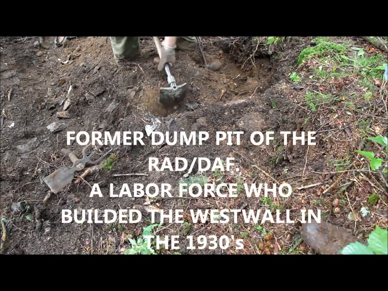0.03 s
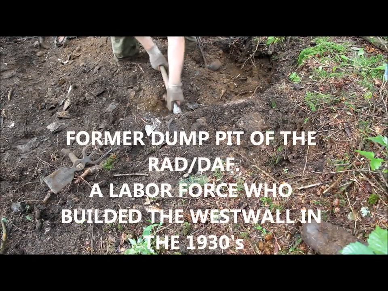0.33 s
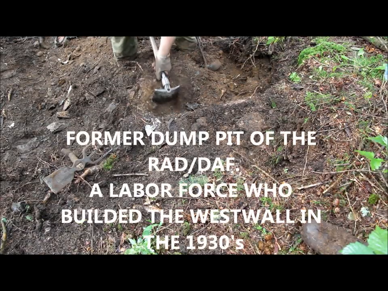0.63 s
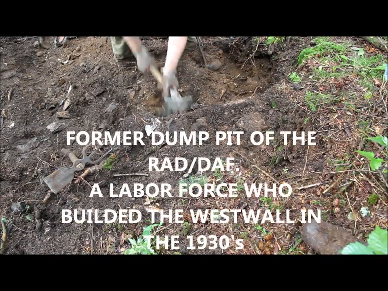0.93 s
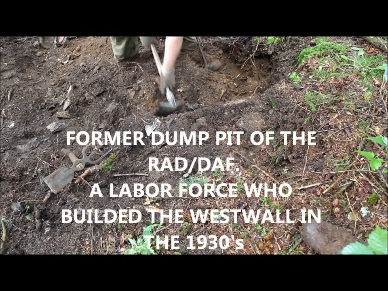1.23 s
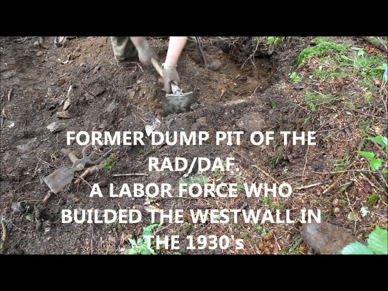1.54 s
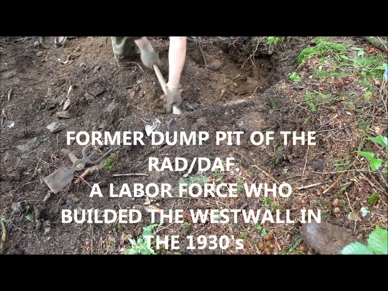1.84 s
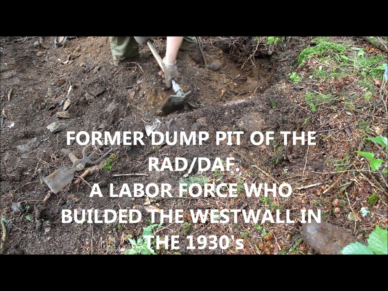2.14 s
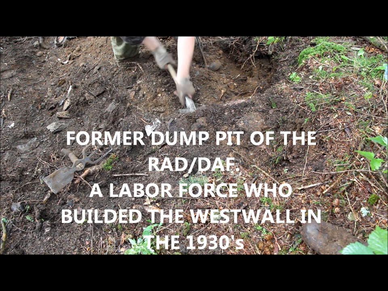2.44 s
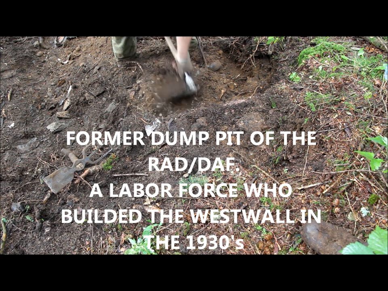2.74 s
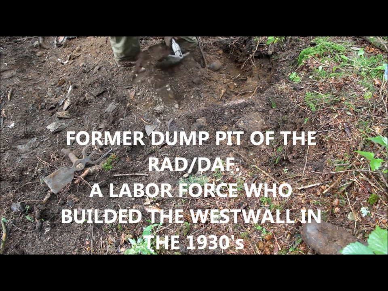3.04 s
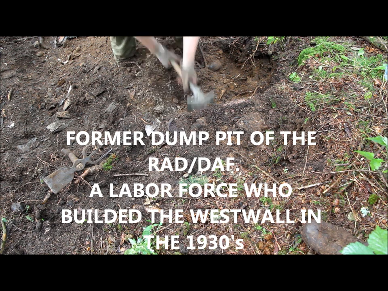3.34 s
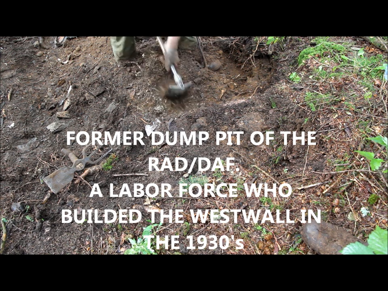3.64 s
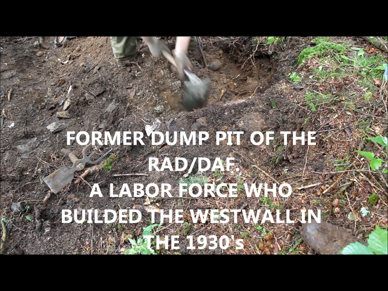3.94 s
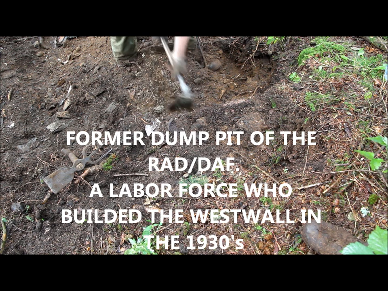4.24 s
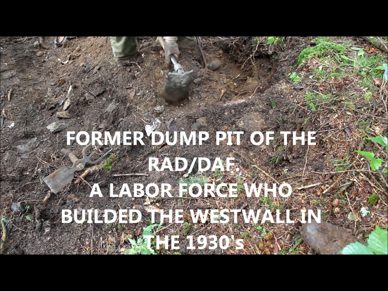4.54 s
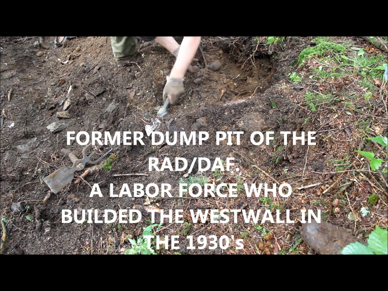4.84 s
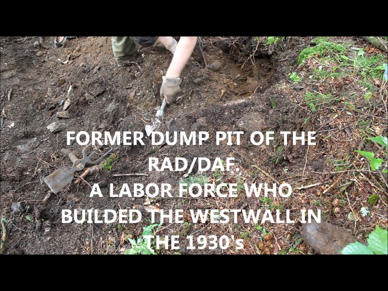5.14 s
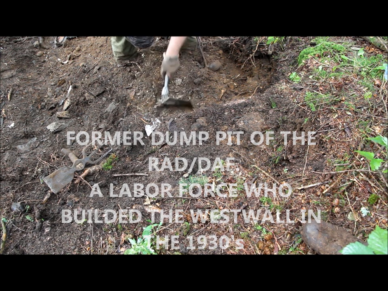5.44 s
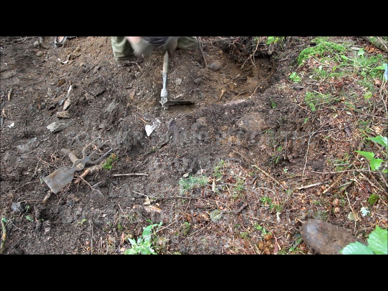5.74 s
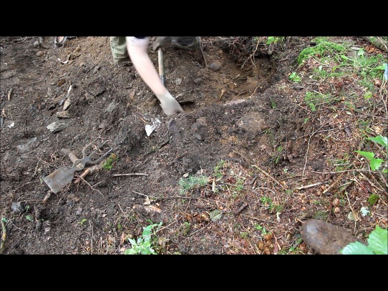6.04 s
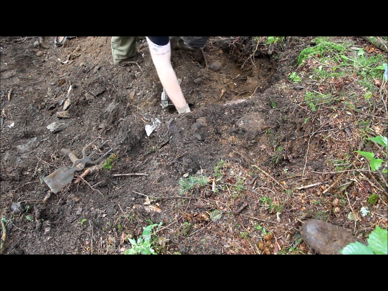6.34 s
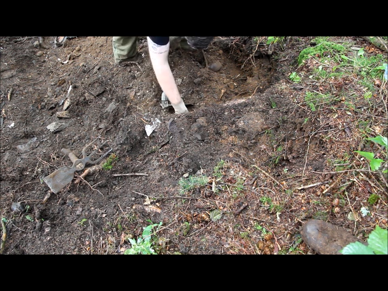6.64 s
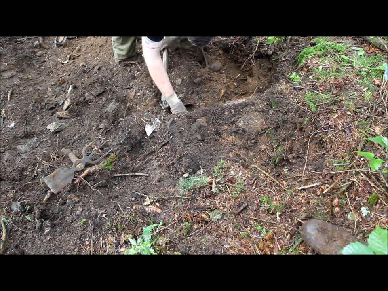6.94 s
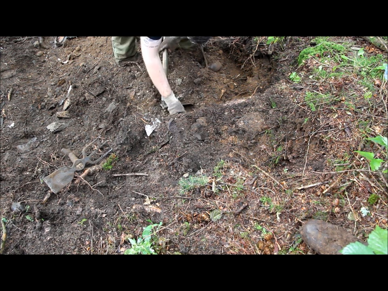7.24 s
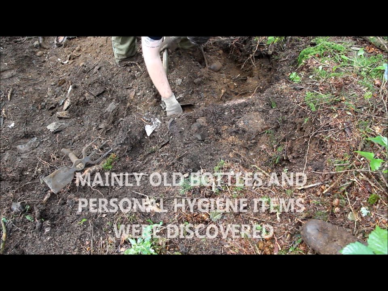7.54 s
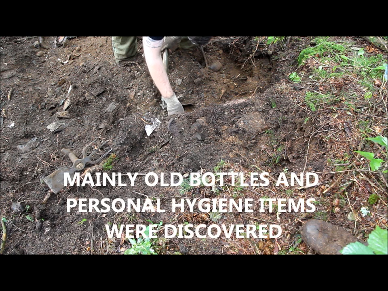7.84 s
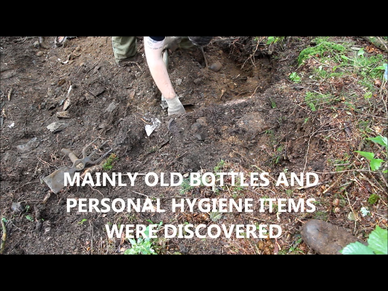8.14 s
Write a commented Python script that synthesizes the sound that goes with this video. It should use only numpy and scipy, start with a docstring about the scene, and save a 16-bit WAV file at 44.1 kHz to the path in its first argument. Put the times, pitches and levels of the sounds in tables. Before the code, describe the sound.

A small steel shovel hacks into stony soil close by, in short repeated strokes. Grit hisses along the blade, stones make it clink and ring briefly, and tossed earth patters down with dull thuds. After about five seconds the shovel is set down with a clink, and a gloved hand picks quietly through ticking crumbs. Light wind runs through the forest, and a distant bird chirps very faintly in the second half.

```python
"""A faint rustle and a few ticking crumbs come first, then a small steel shovel hacks into stony soil.
In each short stroke, grit hisses along the blade, stones make it ring and the earth thuds.
Loads of earth are tossed aside, the shovel is set down with a clink, and a gloved hand picks through
the crumbs. Light wind stirs the forest all along, and near the end a small bird calls faintly."""
import sys
import numpy as np
from scipy import signal
from scipy.fft import rfft, irfft, next_fast_len
from scipy.io import wavfile
from scipy.ndimage import map_coordinates

SR = 44100
rng = np.random.default_rng(int(sys.argv[2]) if len(sys.argv) > 2 else 0)


def unload_audio(sound):
    """Save the sound as a 16-bit wav file, at the path given as the first command line argument."""
    columns = np.transpose(np.atleast_2d(sound))
    # keep every value between -1 and 1, then stretch to whole-number steps
    steps = np.round(np.clip(columns, -1, 1) * 32767)
    wavfile.write(sys.argv[1], SR, steps.astype(np.int16))


N = 370440  # 8.4 seconds

# A ring time (t60) is how long a sound takes to fade by 60 dB. Levels are set before mixing.
# the blade drags through earth: (time [s], fall [s], level [dB], flex level [dB], flex pitch [Hz])
DRAGS = [(0.427, 0.009, -24.5, -38.5, 615), (0.518, 0.0043, -19.5, -27.5, 394),
         (0.548, .018, -34, -39, 570), (0.601, 0.014, -27.5, -39.5, 1900), (1.221, 0.022, -31, -35, 1320),
         (1.261, .026, -55, -46.5, 640), (1.308, 0.0097, -27.5, -34, 660), (1.342, 0.0066, -26, -40.5, 606),
         (1.806, .011, -25.5, -43, 600), (1.84, 0.0055, -34, -49, 1300), (1.928, 0.009, -25.5, -32.5, 610),
         (1.953, 0.0069, -28, -42.5, 600), (2.037, 0.02, -40, -48, 546), (2.081, 0.0045, -30.5, -41, 1290),
         (2.11, 0.0095, -36, -62, 600), (2.137, 0.022, -39.5, -65, 1300), (3.492, .01, -26, -42, 1300),
         (3.512, 0.0057, -24.5, -32.5, 1290), (3.58, 0.01, -30.5, -41.5, 1300),
         (3.605, 0.0044, -25, -35.5, 600), (3.628, 0.0069, -23, -28, 1920), (3.65, 0.0079, -41, -40.5, 370),
         (3.679, 0.015, -30.5, -52, 370), (3.722, 0.015, -29, -48, 367), (3.75, 0.0063, -35.5, -56, 1900),
         (4.123, 0.021, -37.5, -49.5, 600), (4.157, 0.0065, -23.5, -37.5, 1300),
         (4.25, 0.024, -31.5, -39, 1870), (4.293, 0.0063, -22, -31, 645), (4.335, 0.015, -31, -44.5, 368),
         (4.371, 0.0045, -24.5, -29, 1320), (5.161, 0.005, -45, -42, 620), (5.178, 0.0031, -28, -62, 1900),
         (5.197, 0.0032, -37, -58, 600)]
# the steel blade's own tones: (pitch [Hz], level [dB], ring time before the earth damps it [s])
BLADE_TONES = [(379, -1.5, 0.069), (553, 0, 0.14), (1308, 7.5, 0.023), (1921, 3.5, 0.051),
               (2100, -12, 0.046), (3123, 1, 0.034), (3887, 0.5, 0.07), (4024, 2.5, 0.066),
               (4430, -5, 0.012), (4890, 0.5, 0.084), (5480, -4, 0.017), (5770, 3, 0.076),
               (6906, 5.5, 0.051), (7900, -15, .07), (8280, 1, 0.035), (8990, -1, 0.045),
               (9330, -30, 0.076), (11000, -13, .04)]
# the blade meets a stone: (time [s], level [dB], crack pitch [Hz], knock level offset [dB])
STONE_HITS = [(0.417, -12.5, 5570, -17), (0.5173, -16, 3540, -34), (0.617, -16.5, 4250, -35),
              (1.137, -16.5, 1100, -14), (1.3364, -23, 6660, -29.5), (1.372, -14, 4720, -33),
              (1.387, -23, 5070, -38), (1.3986, -21.5, 3760, -36), (1.771, -17.5, 6370, -33),
              (2.0773, -17.5, 4340, -31), (2.1037, -17.5, 5100, -40), (2.293, -30, 3300, -15),
              (2.5701, -6, 2110, -18), (3.6043, -10.5, 5480, -30), (3.622, -12.5, 2720, -17),
              (3.7234, -13.5, 3040, -31), (3.748, -17.5, 8300, -29), (4.292, -13.5, 3900, -34),
              (4.365, -10, 4410, -15.5), (5.1575, -24, 2500, -24), (5.4213, -28, 3150, -17),
              (5.5637, -12.5, 3830, -38)]
# a stone's own tones: (pitch [ratio to their centre])
STONE_RATIOS = [.72, 0.949, 1.22, 1.65]
# the blade rings on, clear of the earth: (time [s], level [dB], pitch [Hz], ring time [s])
FREE_RINGS = [(1.372, -22, 4200, .05), (1.388, -23, 5600, 0.063), (2.291, -44.5, 1933, 0.45),
              (2.295, -43, 3130, 0.13), (2.571, -15, 2160, 0.036), (2.571, -16, 3130, 0.037),
              (3.05, -55, 5400, .35), (5.386, -31, 8300, 0.036), (5.566, -29, 1885, 0.065),
              (5.567, -20.5, 2750, 0.038), (5.565, -22, 4300, 0.031), (5.566, -22, 8280, 0.033)]
# the blade or a clod hits packed earth: (time [s], level [dB])
EARTH_BLOWS = [(0.42, -29.5), (0.841, -34), (0.89, -33), (1.139, -34.5), (1.304, -42), (1.808, -35),
               (3.509, -34), (3.63, -38), (6.666, -46)]
# loose earth slides and lands:
# (time [s], rise [s], hold [s], fade [dB/s], level [dB], clod level offset [dB])
EARTH_LOADS = [(0.835, 0.0048, 0.022, 129, -25, -12), (2.57, 0.0044, 0.0087, 400, -34.5, -9.5),
               (2.656, 0.031, 0.044, 300, -38, -14.5), (2.754, 0.014, .075, 328, -37, -17.5),
               (6.66, .006, .012, 161, -43, -15), (6.723, 0.055, .008, 165, -37, -12)]
# crumbs, pebbles and twigs tick: (time [s], level [dB], pitch [Hz])
CRUMB_TICKS = [(0.178, -24.5, 4940), (0.26, -25.5, 3800), (0.711, -30.5, 1330), (0.79, -31, 1260),
               (1.651, -25.5, 1080), (2.471, -25.5, 1340), (2.91, -26, 2730), (3.11, -26, 4100),
               (3.138, -30.5, 1170), (3.167, -22, 1920), (3.836, -22.5, 1920), (4.706, -40.5, 805),
               (5.097, -30, 732), (6.063, -30, 1910), (6.387, -28, 1120), (6.567, -26, 2440),
               (7.066, -28.5, 1630), (7.228, -26.5, 1000), (7.473, -32, 2720), (7.704, -26, 2200),
               (7.816, -29.5, 3240), (7.989, -29, 4890), (8.014, -28.5, 1050), (8.097, -23.5, 1630),
               (8.213, -28, 4640), (8.285, -25, 2300)]
# damp soil gives way under a hand or boot: (time [s], fall [s], level [dB])
SOIL_SHIFTS = [(3.26, 0.065, -49), (5.235, 0.018, -47), (8.26, 0.045, -52)]
# hand and boots brush the litter, the loose bits on the ground: (time [s], fall [s], level [dB])
BRUSHES = [(0.01, 0.052, -47.5), (0.19, 0.1, -43.5), (2.6, 0.069, -42), (2.91, 0.15, -53),
           (3.24, 0.082, -52.5), (3.42, .02, -49.5), (3.95, 0.054, -54), (4.865, 0.033, -46),
           (4.962, .016, -39), (5.28, 0.12, -46.5), (5.435, .025, -41), (5.61, 0.083, -47),
           (5.78, 0.066, -50.5), (6.52, 0.12, -55), (7.24, 0.014, -44.5), (8.27, 0.18, -50.5)]
# the litter never quite comes to rest: (time [s], level [dB])
SETTLING_LEVELS = [(0, -57.5), (2.3, -50.5), (4.6, -55), (5.7, -53), (6.1, -60.5), (7.4, -59), (8, -54.5),
                   (8.4, -52)]
# a small, distant bird calls: (time [s], level [dB], top pitch [Hz])
BIRD_CALLS = [(6.085, -65, 6100), (6.5, -54, 7740), (7.395, -61, 7600)]
# wind in the trees: (time [s], level [dB])
WIND_LEVELS = [(0, -56), (1.5, -54.5), (3.3, -52.5), (4.6, -55.5), (7.6, -54), (8.4, -54)]

# the tone colour of each noise, from bass to treble: (frequency [Hz], level [dB])
GRIT_COLOUR = [(150, -50), (600, -1), (1200, -5.5), (2200, 0), (4000, 3), (7000, -5.5), (10000, -8),
               (16000, -22)]  # grit on steel
THUD_COLOUR = [(30, -43), (80, -16), (170, -3.5), (300, -2.5), (480, -9), (900, -11), (1600, -20),
               (4000, -49)]  # shoved or struck earth
PATTER_COLOUR = [(200, -37), (600, -3), (1500, 0), (3500, 4.5), (6500, 1), (9500, -2.5), (12000, -13.5),
                 (16000, -23)]  # fine earth landing
CLOD_COLOUR = [(25, -29), (60, -6), (200, 1.5), (400, -3), (900, -7), (3000, -37.5)]  # clods landing
LITTER_COLOUR = [(200, -10), (700, -7.5), (2000, -2.5), (4000, -1), (7000, -4), (10000, -9.5), (16000, -21)]  # rustling litter
WIND_COLOUR = [(20, -36), (40, -10), (58, 0), (80, -1), (115, -1), (160, -1.5), (250, 1), (480, -2),
               (1000, 0.5), (2300, -4.5), (5500, -14.5), (7600, -15), (10000, -19.5), (16000, -30.5)]  # wind in the treetops


def shovel_scrapes(grit_db=-1.5, ring_db=-2.0, flex_db=4.5, thud_db=-15.5, catch_db=4):
    """Each drag makes grit hiss, rings the edge, flexes the whole blade and shoves the soil."""
    out, t = np.zeros(N), np.arange(-SR // 20, SR // 10) / SR
    for s, fall, db, bend_db, bend_hz in DRAGS:
        swell = swell_of(t, 0.89 * fall, fall)
        catching = np.tanh(wobble(252.5, size=len(t)))  # the edge catches and slips on coarse grains
        crunch = swell * unit(amp(catch_db * catching))
        grit = crunch * coloured(grains(len(t), rate=3000, spread=0.89), GRIT_COLOUR)
        contact_hz = 4600 * np.exp(rng.uniform(-0.084, 0.18))  # each drag meets the edge somewhere else
        edge = rubbed(crunch, blade_ring(contact_hz, octaves=0.95, vary=0.79, detune=.022, damping=0.64))
        flex = rubbed(swell, blade_ring(bend_hz, octaves=0.7, vary=0.097, detune=0.005, damping=0.88))
        thud = swell * coloured(rng.standard_normal(len(t)), THUD_COLOUR)
        steel = amp(db + ring_db) * edge + amp(bend_db + flex_db) * flex
        add(out, s + t[0], amp(db + grit_db) * grit + steel + amp(db + thud_db) * thud)
    return out


def blade_ring(centre_hz, octaves, vary, detune, damping):
    """One tap wakes the blade's tones, mostly near centre_hz; clinging earth shifts their pitch."""
    t = np.arange(SR // 12, dtype=np.float32) / SR
    hz, db, t60 = np.transpose(BLADE_TONES)
    gain, shift, phase = rng.uniform(-1.0, 1, (3, len(BLADE_TONES)))
    ring_time = t60 * damping
    distance = np.log2(hz / centre_hz) / octaves
    weight = amp(db) * np.exp(vary * gain - .5 * distance ** 2) / np.sqrt(ring_time)
    pitch = hz * (1 + detune * shift)
    tones = np.sin(2 * np.pi * np.outer(t, pitch) + np.pi * phase)
    ring = (tones * fade(t[:, None], ring_time)) @ weight
    return ring / np.linalg.norm(ring)


def rubbed(swell, ring):
    """Rubbing is a stream of tiny taps that keeps the blade ringing, with the energy of the swell."""
    taps = swell * grains(len(swell), rate=6500, spread=0.28)
    ringing = signal.fftconvolve(taps, ring)[:len(swell)]
    return unit(ringing) * np.sqrt(np.mean(swell ** 2))


def stone_hits(crack_db=-13, ring_db=-16, clack_db=-18, knock_db=-10):
    """A stone cracks against the steel; both ring briefly, damped by the earth."""
    out, t = np.zeros(N), np.arange(SR // 12) / SR
    for s, db, hz, low_db in STONE_HITS:
        noise = unit(resonant(resonant(rng.standard_normal(len(t)), hz, q=1.0), hz, q=0.2))
        crack = noise * (fade(t, t60=0.053) + 2.53 * fade(t, t60=0.013))
        ring = blade_ring(hz, octaves=1.23, vary=0.12, detune=0.0375, damping=0.77)
        ring = ring / np.std(ring[:SR // 200])  # the first 5 ms set its level
        # every stone clacks with a few tones of its own
        scatter = np.exp(0.11 * rng.standard_normal(len(STONE_RATIOS)))
        stone_hz = np.sqrt(hz * 3700) * np.array(STONE_RATIOS) * scatter
        tones = np.sin(2 * np.pi * (np.outer(t, stone_hz) + rng.random(len(STONE_RATIOS))))
        clack = unit(tones.sum(axis=1)) * fade(t, t60=0.065)
        knock = coloured(rng.standard_normal(len(t)), THUD_COLOUR) * fade(t, t60=0.064)
        bright = amp(crack_db) * crack + amp(ring_db) * ring + amp(clack_db) * clack
        add(out, s, amp(db) * (bright + amp(low_db + knock_db) * knock))
    return soften(out, above_hz=11500)  # the contact takes a moment, which limits the treble


def singing_blade(rise_s=0.0011):
    """Tapped while clear of the earth, the blade sings on in pure tones."""
    out, t = np.zeros(N), np.arange(SR // 3) / SR
    onset = 1 - np.exp(-t / rise_s)
    for s, db, hz, t60 in FREE_RINGS:
        add(out, s, amp(db) * onset * fade(t, t60) * np.sin(2 * np.pi * hz * t))
    return out


def earth_thumps(rise_s=0.0027, fall_s=0.0092):
    """Packed earth answers a blow with one dull push."""
    out, t = np.zeros(N), np.arange(-SR // 50, SR // 10) / SR
    for s, db in EARTH_BLOWS:
        thud = coloured(rng.standard_normal(len(t)), THUD_COLOUR)
        add(out, s + t[0], amp(db) * swell_of(t, rise_s, fall_s) * thud)
    return out


def tossed_earth(flutter_db=1):
    """Thrown earth patters down in many fine grains over the dull thud of its clods."""
    out, t = np.zeros(N), np.arange(SR * 2 // 5) / SR
    for s, rise, hold, fade_rate, db, clods_db in EARTH_LOADS:
        fading_s = np.maximum(t - rise - hold, 0)
        loudness = np.minimum(t / rise, 1) * amp(db - fade_rate * fading_s)
        patter = coloured(grains(len(t), rate=12000, spread=0.54), PATTER_COLOUR)
        patter *= amp(flutter_db * wobble(69.6, size=len(t)))
        clods = coloured(grains(len(t), rate=1500, spread=2.2), CLOD_COLOUR) * amp(clods_db)
        add(out, s, loudness * (patter + clods))
    return out


def falling_crumbs(stir, tick_db=-9, tap_db=-17, settle_db=-23, extra_count=40, extra_hz=1010):
    """Each crumb lands with a dry tick and a duller tap, then a few smaller bits settle."""
    out, t = np.zeros(N), np.arange(SR // 20) / SR
    extras = []  # more crumbs fall by chance, louder where the litter is stirred more
    for when, weight, pitch in rng.random((extra_count, 3)):
        stir_db = 20 * np.log10(stir[int(when * N)])
        extras.append((when * N / SR, stir_db + 9.5 + 8 * weight, extra_hz * 2 ** (2 * pitch - 1)))
    for s, db, hz in CRUMB_TICKS + extras:
        dry_noise = resonant(rng.standard_normal(len(t)), hz, q=0.71)
        dull_noise = resonant(resonant(rng.standard_normal(len(t)), hz * 0.55, q=0.32), hz * 0.69, q=0.47)
        trickle = resonant(grains(len(t), rate=2700, spread=2.4), hz, q=1.9)
        tick = amp(tick_db) * unit(dry_noise) * fade(t, t60=0.015)
        tap = amp(tap_db) * unit(dull_noise) * fade(t, t60=0.049)
        bits = amp(settle_db) * unit(trickle) * fade(t, t60=0.11)
        add(out, s, amp(db) * (tick + tap + bits))
    return soften(out, above_hz=10000)


def shifting_soil(crunch_hz=1380):
    """Damp soil gives way with a soft crunch that has little treble."""
    t = np.arange(N) / SR
    power = sum((amp(db) * swell_of(t - s, 0.57 * fall, fall)) ** 2 for s, fall, db in SOIL_SHIFTS)
    soil = grains(N, rate=1500, spread=1)
    crunch = resonant(resonant(soil, crunch_hz, q=0.56), crunch_hz, q=0.56)
    return np.sqrt(power) * unit(crunch)


def litter_stirring(spill_db=-18):
    """How strongly the litter moves: it settles, spills with each drag and is brushed by hand and boots."""
    power = amp(level_curve(SETTLING_LEVELS)) ** 2
    t = np.arange(-SR // 4, SR // 2) / SR
    spill = swell_of(t, rise=0.027, fall=0.087)
    for s, _, db, _, _ in DRAGS:
        add(power, s + t[0], (amp(db + spill_db) * spill) ** 2)
    for s, fall, db in BRUSHES:
        power += (amp(db) * swell_of(np.arange(N) / SR - s, 0.85 * fall, fall)) ** 2
    return np.sqrt(power)


def litter_rustle(stir, rustle_db=-4.0, crackle_db=-10, clump_db=3.0):
    """Stirred litter rustles in clumps, with single specks standing out."""
    rustle = grains(N, rate=9000, spread=.5) * amp(rustle_db + clump_db * wobble(45))
    t = np.arange(SR // 100) / SR
    speck = rng.standard_normal(len(t)) * fade(t, t60=0.0037)
    specks = unit(signal.oaconvolve(grains(N, rate=70, spread=1), speck)[:N])
    stirred = rustle + amp(crackle_db) * specks
    return stir * np.std(stirred) * coloured(stirred, LITTER_COLOUR)


def bird(length_s=0.025, pitch_dip=0.058, warble_hz=42):
    """Each call is a short, high, warbling whistle."""
    out, t = np.zeros(N), np.arange(SR // 10) / SR
    for s, db, hz in BIRD_CALLS:
        pitch = hz * (1 - pitch_dip * np.cos(np.pi * warble_hz * t) ** 2)
        loudness = np.sin(np.pi * np.minimum(t / length_s, 1))
        add(out, s, amp(db) * loudness * np.sin(2 * np.pi * np.cumsum(pitch) / SR))
    return out


def wind(lift_db=0.25, flutter_db=1):
    """Air moves through the treetops with a soft, even rush and a little rumble."""
    level_db = level_curve(WIND_LEVELS) + lift_db + flutter_db * wobble(6.7)
    return amp(level_db) * coloured(rng.standard_normal(N), WIND_COLOUR)


def forest_echo(x, near_db=-12, far_db=-24):
    """The walls of the hole scatter the sound at once; tree trunks add a fainter, longer echo."""
    t = np.arange(SR // 2) / SR
    near = rng.standard_normal(len(t)) * fade(t, t60=0.084)
    far = resonant(rng.standard_normal(len(t)) * fade(t, t60=0.41), 2600, q=0.43)
    echo = amp(near_db) * near / np.linalg.norm(near) + amp(far_db) * far / np.linalg.norm(far)
    return x + signal.fftconvolve(x, echo)[:N]


def amp(db):
    """Turn decibels into a number to multiply by."""
    return 10 ** (np.asarray(db) / 20)


def unit(x):
    """Scale x to an average (rms) strength of 1."""
    return x / np.sqrt(np.mean(x ** 2) + 1e-20)


def fade(t, t60):
    """Die away by 60 dB every t60 seconds."""
    return amp(-60 * t / t60)


def swell_of(t, rise, fall):
    """Pressure builds smoothly up to t = 0 and lets go with a tail."""
    return np.exp(np.where(t < 0, -.5 * (t / rise) ** 2, 1 - np.sqrt(1 + 2 * (t / fall) ** 2)))


def level_curve(rows):
    """Join (time, level) points with straight lines, one value per sample."""
    return np.interp(np.arange(N) / SR, *np.transpose(rows))


def wobble(rate, size=N):
    """A smooth curve through random points, rate of them a second."""
    points = rng.standard_normal(int(size * rate / SR) + 4)
    steps = np.arange(0, len(points), 1 / 8)
    return np.interp(np.arange(size) * rate / SR, steps, map_coordinates(points, [steps]))


def grains(size, rate, spread):
    """About rate tiny random impacts a second; more spread makes the strong ones stand out."""
    chance, strength = rng.random(size), rng.uniform(-0.97, 1, size)
    return unit((chance < rate / SR) * strength * np.exp(spread * strength ** 2))


def filtered(x, response):
    """Turn each frequency in x up or down by response(frequency)."""
    size = next_fast_len(len(x) + 512, True)
    return irfft(rfft(x, size) * response(np.fft.rfftfreq(size, 1 / SR)), size)[:len(x)]


def coloured(x, colour):
    """Give x a tone colour from a table, at a strength of 1."""
    hz, db = np.transpose(colour)
    return unit(filtered(x, lambda f: amp(np.interp(np.log(f + 1), np.log(hz), db))))


def resonant(x, hz, q):
    """Keep a band of x around hz; a higher q makes it narrower."""
    return filtered(x, lambda f: 1j * f * hz / q / (hz ** 2 - f ** 2 + 1j * f * hz / q))


def soften(x, above_hz):
    """Gently turn down the treble."""
    return filtered(x, lambda f: 1 / np.sqrt(1 + (f / above_hz) ** 4))


def add(track, s, sound):
    """Mix a sound into the track, starting at s seconds."""
    start = max(round(s * SR), 0)
    track[start:start + len(sound)] += sound[:len(track) - start]


def scene():
    """The digging and the bird echo in the forest, over rustling litter and wind, in one channel."""
    stir = litter_stirring()
    shovel = shovel_scrapes() + earth_thumps() + stone_hits() + singing_blade()
    soil = falling_crumbs(stir) + tossed_earth() + shifting_soil()
    return (forest_echo(shovel + soil + bird()) + litter_rustle(stir) + wind())[None]


def record(dry, ceiling=.62, top_hz=15950):
    """Round off the hardest peaks and cut away the very highest treble."""
    rounded = dry / (1 + (dry / ceiling) ** 4) ** .25
    return np.array([filtered(x, lambda hz: 1 / (1 + (hz / top_hz) ** 120)) for x in rounded])


dry = scene()
out = record(dry)
unload_audio(out)
```